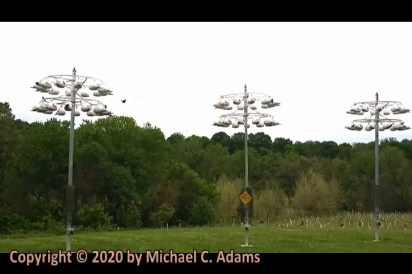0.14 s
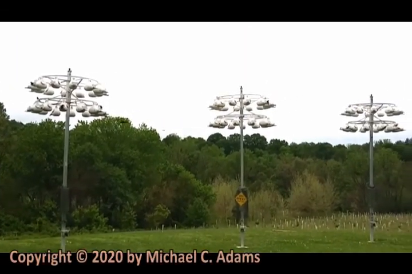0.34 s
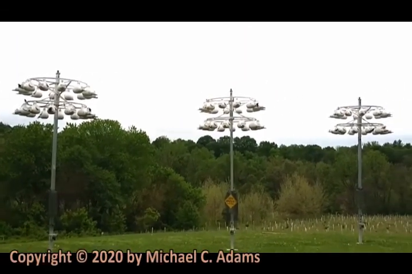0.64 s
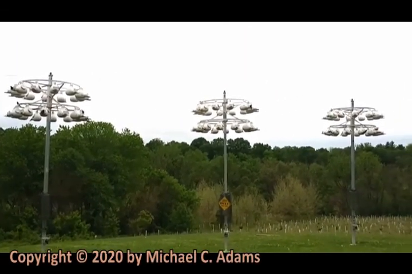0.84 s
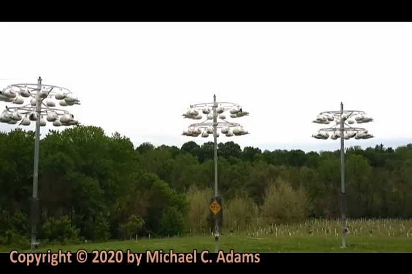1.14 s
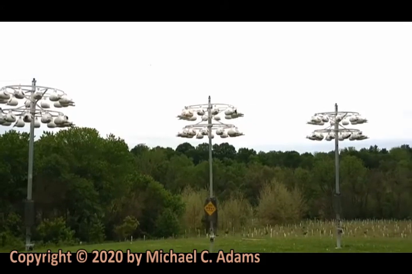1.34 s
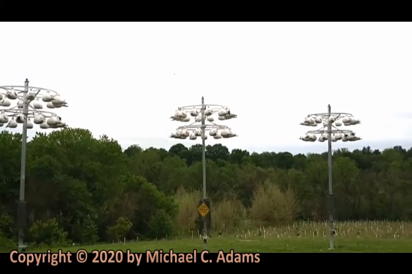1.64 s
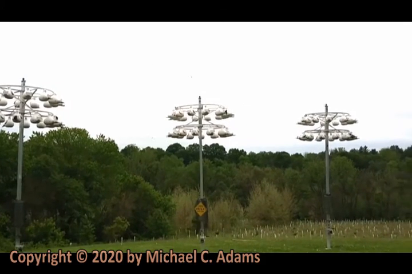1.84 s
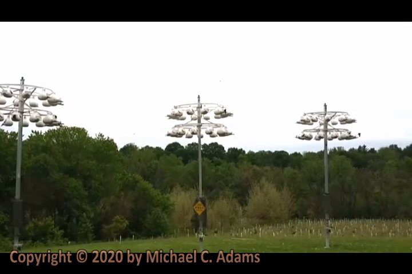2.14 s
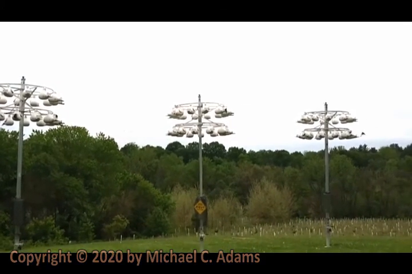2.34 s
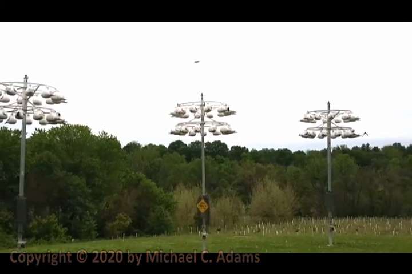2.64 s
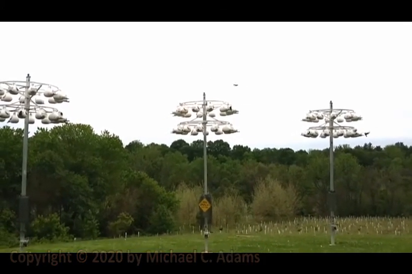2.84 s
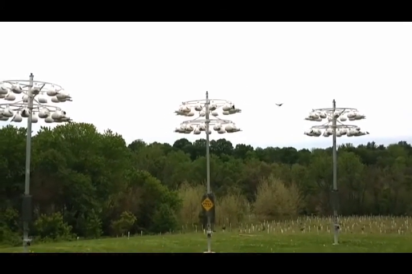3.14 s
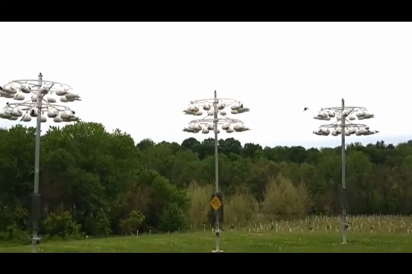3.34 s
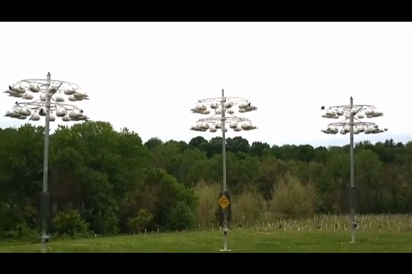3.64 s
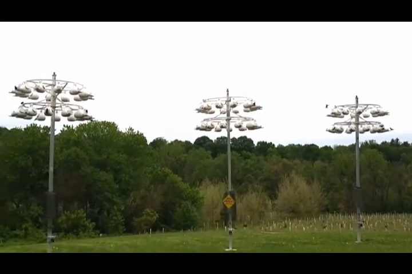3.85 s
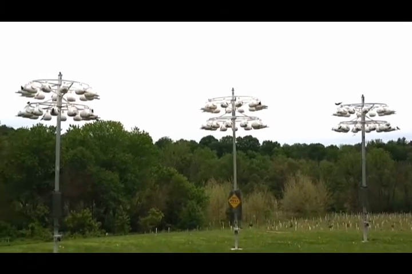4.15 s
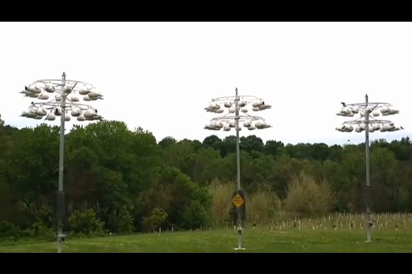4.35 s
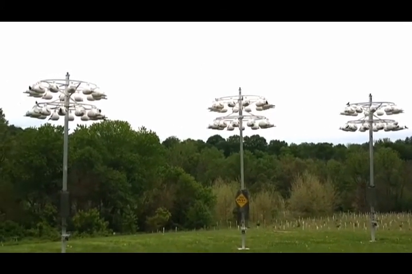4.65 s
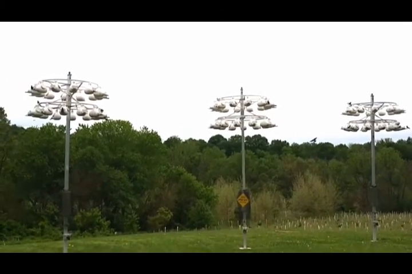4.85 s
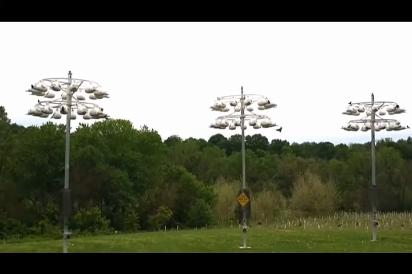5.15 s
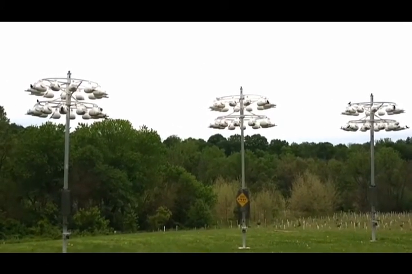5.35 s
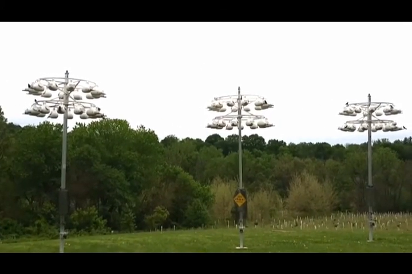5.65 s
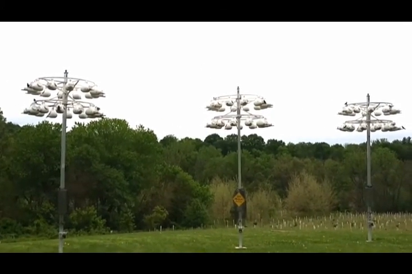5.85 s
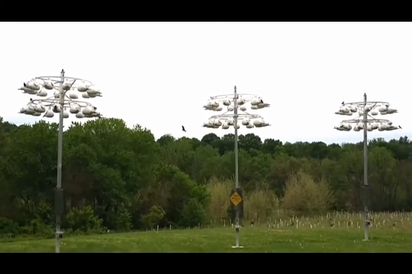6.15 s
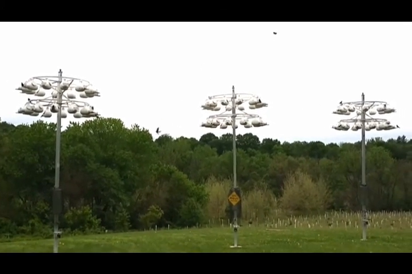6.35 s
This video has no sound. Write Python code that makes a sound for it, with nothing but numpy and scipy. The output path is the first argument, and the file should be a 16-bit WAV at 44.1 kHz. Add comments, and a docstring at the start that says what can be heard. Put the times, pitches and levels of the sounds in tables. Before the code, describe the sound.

Outdoors by a grassy field edged with trees, several martins call over one another. Liquid chirps and a faint distant trill lead into a descending run of notes with fizzy buzzes, then spaced clicks. After a short thinner moment, rapid throaty rattles dominate, punctuated by bright falling whistles and nasal, repeated squawks. The microphone hears the birds clearly and nearly centred, with faint echoes from houses and trees, dull far chatter and a soft engine hum below.

```python
"""Martins chatter round their gourd houses in an open field: mostly falling chirps, hoarse slurs, rattles,
loud whistles, stepped phrases, buzzes and nasal squawks, made of gliding overtones shaped by throat and bill.
Dry clicks are short noise bursts. Farther birds are many dulled slurs, one distant trill and one warble.
Houses and tree line answer with noise echoes; a far engine of wavering tones drones over rumble and soft air."""
import sys
import numpy as np
from scipy import signal
from scipy.fft import rfft, irfft, next_fast_len
from scipy.io import wavfile
from scipy.ndimage import uniform_filter1d, map_coordinates

SR = 44100
rng = np.random.default_rng(int(sys.argv[2]) if len(sys.argv) > 2 else 0)


def dump_mix(stems):
    """Bounce the given channels to the path in sys.argv[1] as a 16-bit WAV at rate SR."""
    frames = np.atleast_2d(stems).T  # one column per channel
    limited = np.clip(frames, -1, 1)  # hard clip at full scale
    pcm = np.round(limited * 32767).astype(np.int16)
    wavfile.write(sys.argv[1], SR, pcm)


N = 287091  # length in samples


def amp(db):
    """Turn decibels into a plain multiplier."""
    return 10 ** (np.asarray(db) / 20)


def unit(x):
    """Scale to an average strength (rms) of 1."""
    return x / np.sqrt(np.mean(x ** 2) + 1e-20)


def along(points, hz):
    """Read between (f/Hz, value) points, with pitch on a log scale."""
    f, value = np.transpose(points)
    return np.interp(np.log(np.abs(hz) + 1), np.log(f), value)


def curves(rows):
    """Draw each column after the time as a curve with one value per sample."""
    t, *columns = np.transpose(rows)
    return [np.interp(np.arange(N) / SR, t, column) for column in columns]


def wobble(rate, size):
    """A smooth random curve through `rate` random points a second."""
    points = rng.standard_normal(int(size * rate / SR) + 4)
    return map_coordinates(points, [np.arange(size) * rate / SR])


def filtered(x, response):
    """Change the strength or timing of each frequency in x."""
    size = next_fast_len(N + 8192)
    spectrum = rfft(x, size) * response(np.fft.rfftfreq(size, 1 / SR))
    return irfft(spectrum, size)[..., :N]


def noise(colour):
    """Random hiss, coloured by (f/Hz, level/dB) points, with rms 1."""
    return unit(filtered(rng.standard_normal(N), lambda hz: amp(along(colour, hz))))


def add(track, start, sound):
    """Mix a sound into the track at a time in seconds."""
    part = track[max(0, round(start * SR)):][:len(sound)]
    part += sound[:len(part)]


def clock(length):
    """The sample times of one call, in seconds."""
    return np.arange(max(64, int(length * SR))) / SR


def fades(t, rise, fall):
    """A soft start and end; rise and fall are in seconds."""
    start = np.clip(t / rise, 0, 1)
    end = np.clip((t[-1] - t) / fall, 0, 1)
    return np.sin(np.pi / 2 * start * end) ** 2


def swell(voice):
    """The running strength of a voice."""
    return np.sqrt(np.abs(uniform_filter1d(voice ** 2, size=160)))


def syrinx(pitch, overtones, mouth, jitter):
    """A bird's trembling voice box: overtones grow and shrink as they glide past the mouth's resonances."""
    shaky_pitch = pitch * (1 + jitter * wobble(895.0, len(pitch)))
    phase = 2 * np.pi * (np.cumsum(shaky_pitch) / SR + rng.random())
    voice = 0
    for multiple, db in overtones:
        hz = multiple * pitch
        strength = amp(db + along(mouth, hz)) * (hz < SR / 2)
        voice = voice + strength * np.sin(multiple * phase)
    return np.sqrt(2) * voice


# How the bill shapes a clear voice: f/Hz, level/dB
PURE_BILL = [(2000, -2), (4500, -0.5), (5700, -11.5), (7000, -7), (8700, 17.5), (10200, 7), (12500, 2),
             (15500, -14)]


def note(t, pitch, level_db, trill, second_db=-32, third_db=-35, trill_hz=155, throb=0.052,
         jitter=0.014, flicker_db=1.5):
    """A nearly pure note; a fast trill shakes its pitch and its strength (both as shares)."""
    flutter = np.sin(2 * np.pi * trill_hz * t + .5 * wobble(83, len(t)))
    strength = amp(level_db + flicker_db * wobble(146, len(t))) * (1 + throb * flutter)
    overtones = [(1, 0), (2, second_db), (3, third_db)]
    voice = syrinx(pitch * (1 + trill * flutter), overtones, PURE_BILL, jitter)
    return strength * fades(t, rise=0.003, fall=0.001) * voice


# Short clear chirps: t/s, length/s, first f/Hz, last f/Hz, level/dB
CHIRPS = [(0, 0.016, 2530, 1570, -34), (0.13, 0.058, 4780, 3360, -48.5), (0.063, 0.025, 2750, 1570, -30.5),
          (0.119, 0.019, 2600, 1785, -36), (0.134, 0.025, 2730, 1830, -27.5), (.202, 0.02, 2820, 1896, -29),
          (0.277, 0.034, 3030, 2510, -29.5), (.367, .042, 2640, 2128, -27.5),
          (0.454, 0.021, 2905, 1820, -28.5), (0.527, 0.023, 2230, 1484, -33),
          (.595, 0.025, 2070, 1510, -37), (.611, 0.0072, 2760, 2100, -37), (0.63, 0.0087, 2570, 1720, -39),
          (0.653, 0.0089, 2640, 1800, -38.5), (0.669, 0.0087, 2370, 1610, -41),
          (0.953, 0.027, 5640, 7300, -36), (1.092, 0.08, 6400, 5040, -55),
          (1.658, 0.046, 7100, 7200, -50.5), (2.671, 0.043, 3630, 2370, -35.5),
          (4.388, 0.033, 3144, 2740, -27.5), (4.403, 0.021, 2540, 1980, -28),
          (4.53, 0.031, 3460, 2495, -25.5), (4.962, 0.043, 3380, 2400, -25.5),
          (5.634, 0.035, 2542, 2094, -31), (5.81, 0.027, 2580, 2120, -32), (6.02, .035, 6700, 5000, -53.5),
          (6.392, 0.053, 4450, 3470, -61)]


def chirps(bend=1.25, crest=0.33, onset_db=-9, fade_db=14, trill=0.01, scoop=0.165, scoop_time=0.00363):
    """Short glides, scooped into from below, that speed up as they die away."""
    out = np.zeros(N)
    for start, length, first_hz, last_hz, db in CHIRPS:
        t = clock(length)
        u = t / t[-1]  # 0 to 1 through the call
        glide = first_hz * (last_hz / first_hz) ** (u ** bend)
        pitch = glide * (1 - scoop * np.exp(-t / scoop_time))
        shape_db = np.interp(u, [0, crest, 1], [onset_db, 0, -fade_db])
        add(out, start, note(t, pitch, db + shape_db, trill))
    return out


# Overtones of a harsh voice: multiple of the pitch, level/dB
OVERTONES = [(1, -0.5), (2, -5.5), (3, -14), (4, -12.5), (5, -12), (6, -31)]
# How throat and open bill shape harsh calls: f/Hz, level/dB
THROAT = [(700, -42), (1250, -1), (1700, -4), (2500, -0.5), (3100, -0.5), (3800, -8), (4600, -10),
          (5700, -26.5), (7000, -17), (8800, 2.5), (10000, -16), (13000, -30), (15500, -24)]


def hoarse(t, pitch, level_db, dull_db, flicker_db=2.5):
    """A rough gliding voice through the throat; dull_db weakens all overtones above the first."""
    overtones = [(k, db - dull_db * (k > 1)) for k, db in OVERTONES]
    flicker = flicker_db * wobble(305, len(t))
    strength = amp(level_db + flicker) * fades(t, rise=0.00035, fall=0.0014)
    wavering = pitch * (1 + .022 * wobble(203, len(t)))
    return strength * syrinx(wavering, overtones, THROAT, jitter=.018)


def slur(length, first_hz, last_hz, db, crest=0.54, onset_db=-7, fade_db=7, dull_db=9):
    """An even fall in pitch that swells and fades."""
    t = clock(length)
    pitch = np.geomspace(first_hz, last_hz, len(t))
    shape_db = np.interp(t / t[-1], [0, crest, 1], [onset_db, 0, -fade_db])
    return hoarse(t, pitch, db + shape_db, dull_db)


# Overall loudness of the far birds: t/s, level/dB
FAR = [(0, -55), (.5, -52.5), (.7, -57.5), (1.25, -57), (1.5, -73), (2, -78), (2.5, -53), (5.2, -60),
       (5.4, -68)]


def far_birds(count=330, dull_hz=4200, wet=0.37, fall=.6, spread_db=13):
    """Overlapping slurs from the farther poles, dulled and blurred by distance."""
    out = np.zeros(N)
    for when, high, slow, loud in rng.random((count, 4)):
        hz = 2300 + 2000 * high
        add(out, when * N / SR, slur(0.01637 + .045 * slow, hz, hz * fall, spread_db * loud))
    blurred = out + wet * tree_line(out)
    dulled = filtered(blurred, lambda hz: 1 / (1 + (hz / dull_hz) ** 2))
    return unit(dulled) * amp(curves(FAR)[0])


# Tones of the far engine: f/Hz, level/dB before engine_db, DRONE and a random flicker are added
ENGINE = [(129.2, -63.5), (258.4, -71.5), (387, -74.5), (512, -77.5), (641, -77.5)]
# Rise and fall of the engine: t/s, added level/dB
DRONE = [(0, 4), (.8, 7.5), (1.5, 1), (3, 1), (6.5, -0.5)]
# Colour of the low rumble: f/Hz, relative level/dB per Hz
RUMBLE = [(20, -20), (35, -31), (54, 1), (100, -4.5), (170, -11.5), (260, -18), (500, -55.5)]
# Colour of the soft air: f/Hz, relative level/dB per Hz
AIR = [(100, -6), (300, -2.5), (700, -3), (1300, -4.5), (2200, -4), (4000, -11), (5500, -16), (8500, -14.5),
       (11000, -33.5), (15500, -64)]
# Loudness of the background: t/s, rumble level/dB, air level/dB
BREEZE = [(0, -56, -58.5), (.9, -52, -56.5), (1.3, -56.5, -63), (3, -54.5, -61), (6.5, -56, -64)]


def field(engine_db=-2):
    """Coloured noise makes the rumble and air; wavering, flickering tones make the far engine."""
    rumble_db, air_db = curves(BREEZE)
    turn = 2 * np.pi * np.cumsum(1 + 0.00897 * wobble(14, N)) / SR
    tones = sum(amp(db + 3.4 * wobble(15, N)) * np.sin(hz * turn) for hz, db in ENGINE)
    engine = amp(engine_db + curves(DRONE)[0]) * np.sqrt(2) * tones
    return amp(rumble_db) * noise(RUMBLE) + amp(air_db) * noise(AIR) + engine


# Colour of the breathy part of a voice: f/Hz, relative level/dB
RASP = [(900, -8), (1600, 3), (2700, 5.5), (4200, -2), (5600, -13.5), (7000, -13), (8800, 3.5),
        (10000, -24), (13000, -30), (15500, -33)]


def rasp(voice):
    """Rough air in the voice box: noise that follows the strength of the voice."""
    return noise(RASP) * swell(voice)


# Hoarse slurs: t/s, length/s, first f/Hz, last f/Hz, level/dB
SLURS = [(.005, 0.0268, 3500, 2524, -40.5), (0.084, .017, 3410, 1910, -44), (0.159, .03, 2103, 1486, -45),
         (0.378, .02, 2040, 1270, -41), (0.396, 0.0208, 2160, 1423, -37.5), (0.412, .025, 3460, 1550, -38),
         (0.449, .055, 1946, 1187, -47.5), (0.47, 0.015, 3350, 1740, -57), (1.028, .04, 1900, 1603, -48),
         (1.068, .016, 5100, 3540, -47), (1.091, 0.024, 2700, 1550, -45), (1.118, .025, 3400, 1516, -46.5),
         (1.152, .039, 5200, 2510, -46.5), (1.204, .022, 3410, 1900, -44.5),
         (1.242, 0.0147, 2620, 1620, -41.5), (1.27, .045, 3020, 1600, -49),
         (1.696, .008, 2350, 1700, -49.5), (1.738, .009, 2360, 1650, -47), (1.881, .033, 3450, 1655, -39),
         (1.9, .039, 4800, 1650, -37.5), (1.928, .025, 4920, 2330, -43), (2.55, 0.027, 3500, 2360, -35.5),
         (2.708, 0.036, 3210, 2210, -32), (2.848, .018, 4420, 2500, -30.5), (3.076, .026, 3890, 1577, -37),
         (3.097, .034, 4320, 1720, -36.5), (3.119, .033, 4640, 1935, -38.5), (3.235, .016, 4080, 2780, -30),
         (3.457, 0.0153, 3276, 2404, -30), (3.97, 0.033, 3060, 2285, -37), (3.999, 0.0174, 2770, 1980, -35),
         (4.071, 0.018, 3500, 2300, -32.5), (4.892, .024, 3420, 1554, -40),
         (4.917, 0.053, 3200, 2050, -33.5), (5.068, .032, 4300, 2230, -36.5),
         (5.258, .028, 4040, 2390, -46), (5.467, 0.022, 2880, 2120, -42), (5.611, .024, 3650, 2600, -34),
         (6.336, 0.054, 2700, 1750, -54)]


def slurs(rasp_db=-18):
    """Single falling hoarse calls, each at its own slope, with a little breath noise."""
    out = np.zeros(N)
    for start, length, first_hz, last_hz, db in SLURS:
        add(out, start, slur(length, first_hz, last_hz, db))
    return out + amp(rasp_db) * rasp(out)


def far_trill(first=0.049, period=.1, top_hz=3990, level_db=-49, count=7):
    """A distant songbird repeats one note whose pitch arches up and down."""
    out, t = np.zeros(N), clock(0.054)
    for k in range(count):
        pitch = top_hz * (1 - 0.27 * (t / t[-1] - .45) ** 2)
        voice = syrinx(pitch, [(1, 0)], PURE_BILL, jitter=0.06)
        add(out, first + k * period, fades(t, rise=0.035, fall=0.038) * voice)
    return amp(level_db) * out


def cascade(first=.736, period=.0484, length=.037, top_hz=2850, step=0.933, slope=0.21, flatten=0.63,
            droop=0.13, level_db=-27, loudest=1.3, fade_db=1.0, waist=0.75, waist_db=-9, end_db=-2,
            trill=.008, scoop=0.023, scoop_time=0.0053, count=7):
    """A phrase steps down the scale: notes get less tilted, dip in strength and end in a downward hook."""
    out, t = np.zeros(N), clock(length)
    u = t / t[-1]
    shape_db = np.interp(u, [.25, waist, .9], [0, waist_db, end_db])
    for k in range(count):
        tilt = slope * flatten ** k * (u - .5)
        hook = droop * u ** 8
        rise = scoop * k * np.exp(-t / scoop_time)  # later notes start from farther below
        pitch = top_hz * step ** k * (1 - tilt - hook - rise)
        db = level_db - fade_db * (k - loudest) ** 2 + shape_db
        add(out, first + k * period, note(t, pitch, db, trill, second_db=-27.0, third_db=-41.5))
    return out


# Trilled buzzes: t/s, length/s, first f/Hz, last f/Hz, level/dB, trill depth as share of pitch
BUZZES = [(0.758, 0.037, 6160, 5420, -42, 0.08), (0.809, 0.065, 6420, 5230, -45, 0.073),
          (2.434, 0.084, 3950, 3280, -42, 0.1), (2.466, 0.071, 2450, 2240, -37, 0.1)]
# Colour of the fizz in a hard trill: f/Hz, relative level/dB
HISS = [(2000, -9), (4000, -18), (6000, -1), (8800, -2), (11000, -8.5), (15500, -41)]


def buzzes(throb=0.26, hard_trill=0.077, fizz_db=-17, fizz_flutter_db=0.5):
    """Notes trilled so hard that they fizz a little unevenly; the deeper the trill, the more fizz."""
    out, fizz = np.zeros(N), np.zeros(N)
    for start, length, first_hz, last_hz, db, trill in BUZZES:
        t = clock(length)
        pitch = np.geomspace(first_hz, last_hz, len(t))
        buzz = fades(t, rise=0.013, fall=0.014) * note(t, pitch, db, trill, throb=throb)
        add(out, start, buzz)
        add(fizz, start, buzz * (trill / hard_trill) ** 2)
    return out + amp(fizz_db + fizz_flutter_db * wobble(220, N)) * noise(HISS) * swell(fizz)


# Dry clicks: t/s, level/dB before level_db is added
CLICKS = [(1.284, -40), (1.325, -32), (1.3985, -29.5), (1.499, -31), (1.5982, -36)]
# Colour of a click: f/Hz, relative level/dB
CLICK_TONE = [(900, -30), (1500, -11), (2900, -3.5), (3800, 9), (4500, -5.5), (6000, -24), (7300, -23),
              (9000, 0), (10500, -42), (13000, -27), (15500, -64)]


def clicks(level_db=4, decay=0.022, slide_db=-23):
    """Very short noise bursts, dying by 60 dB per `decay` seconds, each trailed by a faint falling slide."""
    bursts, slides, t = np.zeros(N), np.zeros(N), clock(.03)
    for start, db in CLICKS:
        add(bursts, start, amp(db + level_db - 60 * t / decay) * fades(t, rise=0.004, fall=.005))
        add(slides, start + .025, slur(.035, 4400, 2400, db + slide_db))
    return noise(CLICK_TONE) * bursts + slides


# Shape of a rattle syllable before its pace is varied:
# t/s, height (tail pitch 0, top pitch 1), level/dB
SYLLABLE = [(0, 1, -13), (.003, .86, -4), (.0075, .5, 0.5), (0.0118, .13, -7.5), (.016, 0, -8.5),
            (.025, -0.185, -17.5)]


def syllable(top_hz, tail_hz, db, tail_db, dull_db=12, pace_spread=0.0796, tail_spread=0.0618,
             tail_spread_db=3.0):
    """One steep plunge, loudest partway down, easing into a low tail; pace and tail vary at random."""
    times, height, shape_db = np.transpose(SYLLABLE)
    times = times * np.exp(pace_spread * rng.normal())
    t = clock(times[-1])
    tail_hz = tail_hz * np.exp(tail_spread * rng.normal())
    pitch = tail_hz + (top_hz - tail_hz) * np.interp(t, times, height)
    in_tail = np.interp(t, times[2:5], [0, .5, 1])
    tail_level = (tail_db + tail_spread_db * rng.normal()) * in_tail
    return hoarse(t, pitch, db + np.interp(t, times, shape_db) + tail_level, dull_db)


def ground(x):
    """The grass returns a slightly late copy, so that a fast glide beats against itself."""
    return filtered(x, lambda hz: 1 + .3 * np.exp(-2j * np.pi * hz * .0012))  # 1.2 ms late


# Rattles, each an even run of plunges; levels before level_db, arch and scatter, tail before its spread:
# first syllable t/s, last syllable t/s, first level/dB, last level/dB, top f/Hz, tail f/Hz, tail level/dB
RATTLES = [(2.068, 2.097, -36.5, -38, 3600, 1854, -1), (2.172, 2.172, -31, -35, 3756, 2297, -1),
           (2.372, 2.423, -33, -28, 3686, 1700, -2), (2.545, 2.622, -29.5, -29, 3565, 1592, -4.5),
           (2.745, 2.821, -29, -30.5, 3437, 1618, -4), (2.947, 3.026, -26.5, -29.5, 3424, 1548, -6.5),
           (3.162, 3.241, -27.5, -28, 3433, 1588, -6), (3.266, 3.314, -35, -31.5, 3294, 1904, 3),
           (3.721, 3.730, -29, -23.5, 3927, 2100, -12), (4.012, 4.092, -30.5, -31, 3720, 1800, -0.5),
           (4.22, 4.292, -35, -32.5, 3370, 1514, -2.5), (4.432, 4.484, -36.5, -31.5, 3314, 1505, 0.5),
           (4.597, 4.669, -31.5, -33.5, 3590, 1814, 5), (4.695, 4.745, -32.5, -31.5, 3140, 1460, -3.5),
           (4.756, 4.805, -32, -29.5, 3900, 2296, 10), (4.829, 4.854, -32, -39.5, 3670, 1820, 4.5),
           (5.004, 5.058, -28.5, -29.5, 3644, 1770, 1), (5.096, 5.172, -27, -37.5, 3607, 1865, 2.5),
           (5.194, 5.272, -30.5, -36.5, 3440, 1560, -0.5)]


def rattles(level_db=-3, spacing=.0255, arch_db=1.5, scatter_db=1.2, partner_db=-8, partner_lag=.0115,
            partner_s=0.01497, partner_drop=0.319, partner_spread=0.0804, partner_spread_db=3.5,
            under_pitch=.74, under_db=-10, rasp_db=-16):
    """Runs of plunges; the voice box's other side crosses each tail, and a lower voice cuts across."""
    out, t = np.zeros(N), clock(partner_s)
    soft = fades(t, rise=.004, fall=.004)
    for first, last, first_db, last_db, top_hz, tail_hz, tail_db in RATTLES:
        count = 1 + int(np.ceil(abs(last - first) / spacing - .3))
        for u in np.linspace(0, 1, count):
            accent, high, loud, late, low = rng.standard_normal(5)
            start = first + u * (last - first)
            run_db = first_db + u * (last_db - first_db) + arch_db * np.sin(np.pi * u)
            db = level_db + run_db + scatter_db * accent
            add(out, start, syllable(top_hz, tail_hz, db, tail_db))
            # The partner holds its pitch, then drops.
            drop = partner_drop * (.5 + rng.random()) * (t / t[-1]) ** 2
            arch = top_hz * np.exp(partner_spread * (high - 1)) * (1 - drop)
            partner = hoarse(t, arch, db + partner_db + partner_spread_db * loud, dull_db=10)
            add(out, start + partner_lag + .002 * late, soft * partner)
            under = hoarse(t, under_pitch * arch, db + under_db + partner_spread_db * low, dull_db=14)
            add(out, start + spacing * rng.random(), soft * under)
    return ground(out) + amp(rasp_db) * rasp(out)


# Loud falling whistles: t/s, length/s, first f/Hz, last f/Hz, level/dB,
# knee of the fall and loudest point (both as shares of the length)
WHISTLES = [(2.073, 0.13, 4360, 2530, -27.5, 0.44, 0.4), (3.625, 0.14, 4136, 2608, -24.5, 0.54, 0.11),
            (4.347, 0.048, 4280, 2200, -28, 0.83, 0.48), (4.484, 0.052, 4170, 2430, -30, 0.73, 0.56),
            (4.913, 0.064, 4580, 2584, -22.5, 0.54, 0.38), (5.571, 0.061, 4596, 2275, -23, 0.55, 0.46),
            (5.754, 0.049, 4450, 2200, -24, .65, 0.51), (6.029, 0.066, 3840, 2330, -38.5, 0.87, 0.27),
            (6.305, 0.031, 3850, 3100, -52, 0.84, 0.5)]


def whistles(shoulder=1.8, onset_db=-15, fade_db=12, trill_per_s=0.18, scoop=0.0894, scoop_time=.004):
    """Whistles scoop up, plunge and ease off, swelling to one crest; long ones are trilled more deeply."""
    out = np.zeros(N)
    for start, length, first_hz, last_hz, db, knee, crest in WHISTLES:
        t = clock(length)
        u = t / t[-1]
        fall = 1 - np.exp(-(u / knee) ** shoulder)
        glide = first_hz * (last_hz / first_hz) ** (fall / fall[-1])
        pitch = glide * (1 - scoop * np.exp(-t / scoop_time))
        shape_db = np.interp(u, [0, crest, 1], [onset_db, 0, -fade_db])
        add(out, start, note(t, pitch, db + shape_db, trill_per_s * length, second_db=-30, third_db=-39))
    return out


# Nasal squawks: t/s, length/s, first f/Hz, last f/Hz, level/dB
SQUAWKS = [(2.186, .115, 2750, 1695, -40.5), (2.573, 0.077, 2555, 1715, -41.5),
           (2.859, 0.14, 2750, 1680, -38), (3.254, .11, 2710, 1748, -38), (3.464, 0.12, 2770, 1620, -38),
           (3.738, .13, 2545, 1649, -39), (4.048, .054, 2616, 1794, -41), (5.487, 0.13, 2345, 1800, -47.5),
           (5.61, .03, 2910, 1640, -42), (5.628, 0.048, 2640, 1990, -42.5),
           (5.786, 0.0285, 2750, 1487, -42.5), (6.076, 0.053, 2500, 1730, -59)]


def squawks(glide=.02, beat=.058, regain=.45, step_db=9.0, sag_db=7, half_db=-14, bright_db=6, rasp_db=-7):
    """Nasal glides, repeated lower and weaker in long calls; period doubling adds faint lines between."""
    out = np.zeros(N)
    whole = [(k, db + bright_db * (k == 2)) for k, db in OVERTONES]  # strong second overtone
    halves = [(k + .5, db + half_db) for k, db in OVERTONES]
    for start, length, first_hz, last_hz, db in SQUAWKS:
        t = clock(length)
        step, since = np.divmod(t, beat)  # which repeat, and seconds since it began
        fall = last_hz + (first_hz - last_hz) * regain ** step * np.exp(-since / glide)
        pitch = fall * (1 + 0.0127 * wobble(121.2, len(t)))
        voice = unit(syrinx(pitch, whole + halves, THROAT, jitter=.013))
        gate = np.clip(np.minimum(since, beat - since) / 0.0033, 0, 1)  # silence between repeats
        level_db = db - step_db * step - sag_db * (since / beat) ** 2 + 2 * wobble(218.0, len(t))
        add(out, start, voice * gate * amp(level_db) * fades(t, rise=.002, fall=.002))
    return out + amp(rasp_db) * rasp(out)


def far_warble(start=5.84, length=0.61, centre_hz=2080, depth=.08, waver_hz=17, level_db=-66, flicker_db=4):
    """A distant bird's low note wavers up and down, coming and going."""
    out, t = np.zeros(N), clock(length)
    waver = np.sin(2 * np.pi * waver_hz * t + wobble(14, len(t)))
    pitch = centre_hz * (1 + depth * waver)
    voice = note(t, pitch, level_db + flicker_db * wobble(22.0, len(t)), trill=0)
    add(out, start, fades(t, rise=0.018, fall=0.065) * voice)
    return out


def gourds(x, decay=0.091):
    """The hard houses and their racks scatter each call: a brief noise echo, 60 dB down per `decay` s."""
    t = clock(.06)
    scatter = rng.standard_normal(len(t)) * amp(-60 * t / decay) * (t > .003)
    return signal.fftconvolve(x, scatter / np.linalg.norm(scatter))[:N]


def slap(x, delay=.056):
    """One distinct echo from a neighbouring rack of houses, dull in the treble."""
    return filtered(x, lambda hz: np.exp(-2j * np.pi * hz * delay) / (1 + (hz / 4000) ** 4))


# How long the tree line rings: f/Hz, time to fall by 60 dB/s
TREES = [(500, 0.85), (2500, 0.17), (9000, 0.57)]


def tree_line(x):
    """A scattered noise echo that dies at its own pace in each frequency band."""
    hz, t, bands = signal.stft(rng.standard_normal(SR // 2), SR, nperseg=256)
    fading = bands * amp(-60 * t / along(TREES, hz)[:, None])
    tail = signal.istft(fading, SR, nperseg=256)[1]
    late = np.pad(x, (200, 0))  # 200 samples late
    return signal.fftconvolve(late, tail / np.linalg.norm(tail))[:N]


def scene(echo_db=-18.0, scatter_db=-12, slap_db=-21):
    """All sounds share the centre, except the whistling bird, a touch to the right."""
    whistler = whistles()
    birds = whistler + chirps() + slurs() + far_trill() + cascade() + buzzes()
    birds = birds + clicks() + rattles() + squawks() + far_warble()
    lean = np.array([[-.065], [.065]]) * whistler  # left weaker, right stronger
    birds = birds + amp(scatter_db) * gourds(birds)
    echoes = amp(slap_db) * slap(birds) + amp(echo_db) * tree_line(birds)
    return birds + lean + echoes + far_birds() + field()


def record(dry, top_hz=15700):
    """Remove everything from top_hz upward."""
    return filtered(dry, lambda hz: hz < top_hz)


dry = scene()
out = record(dry)
dump_mix(out)
```